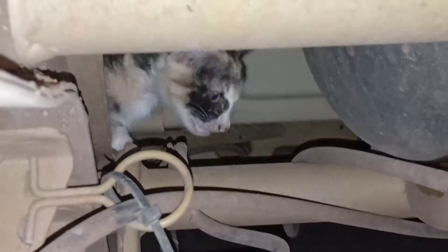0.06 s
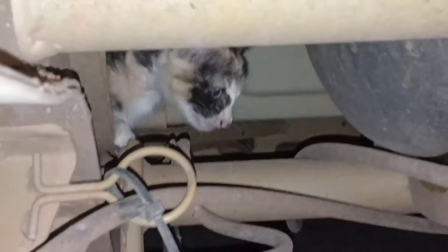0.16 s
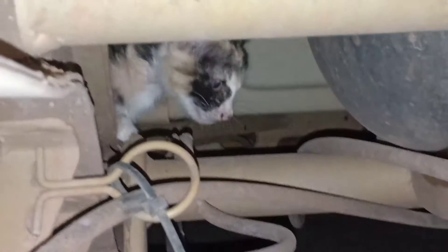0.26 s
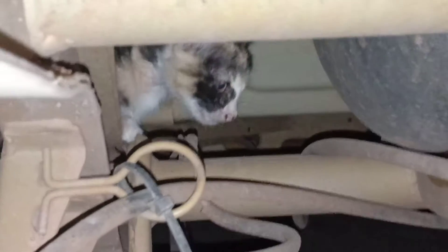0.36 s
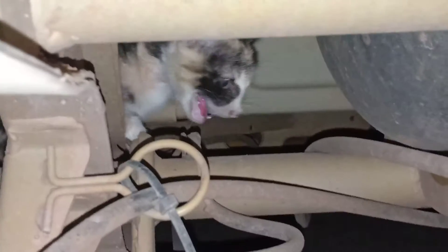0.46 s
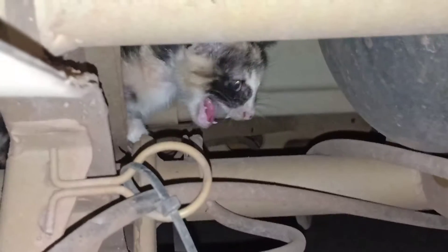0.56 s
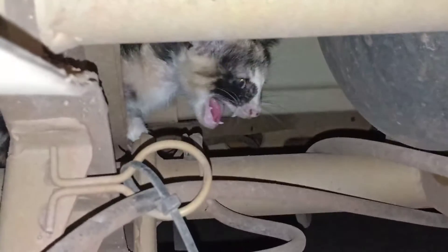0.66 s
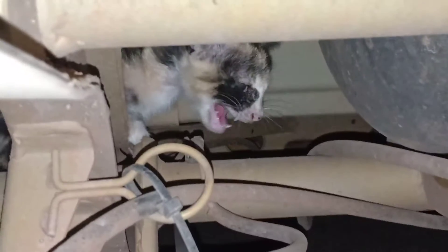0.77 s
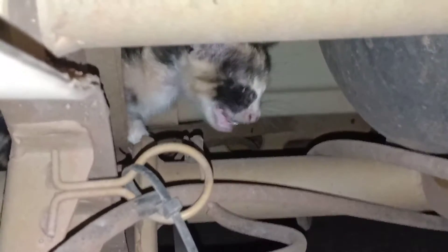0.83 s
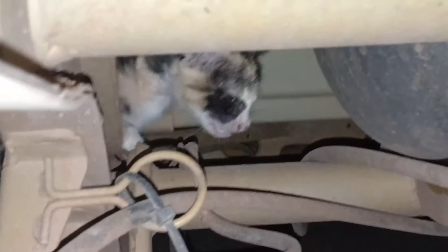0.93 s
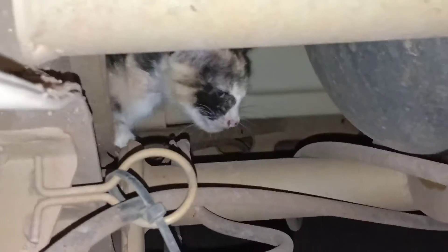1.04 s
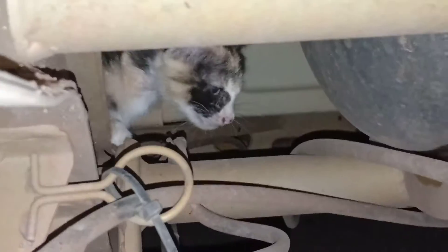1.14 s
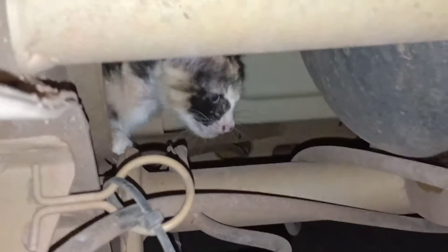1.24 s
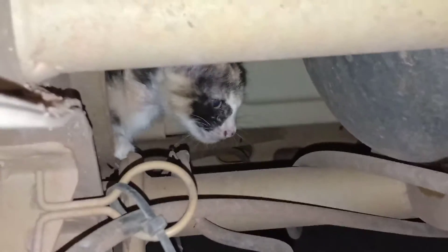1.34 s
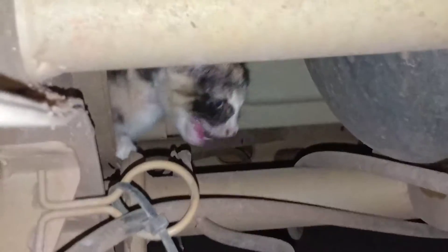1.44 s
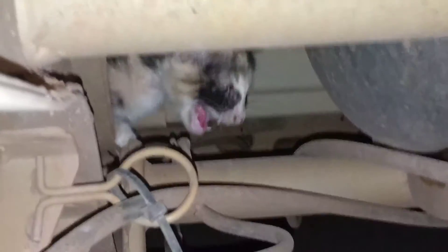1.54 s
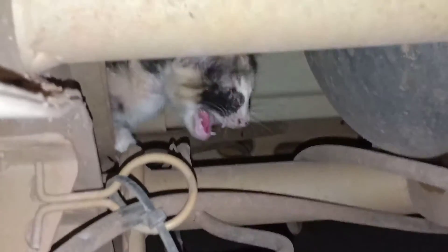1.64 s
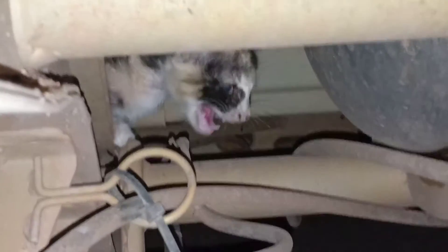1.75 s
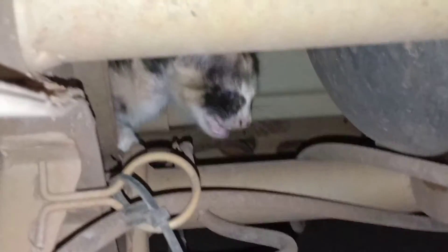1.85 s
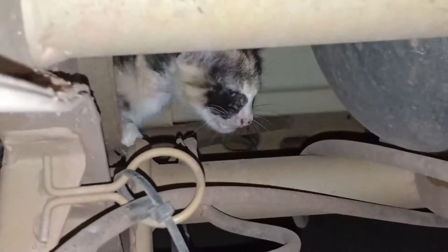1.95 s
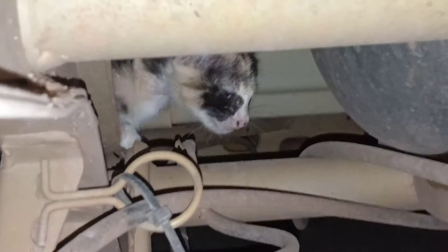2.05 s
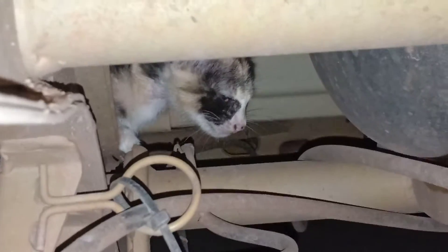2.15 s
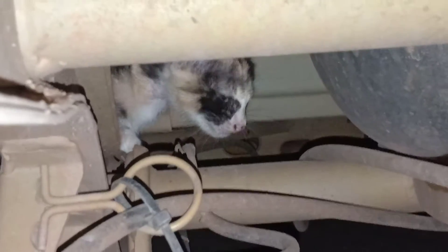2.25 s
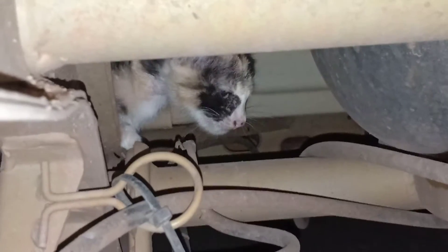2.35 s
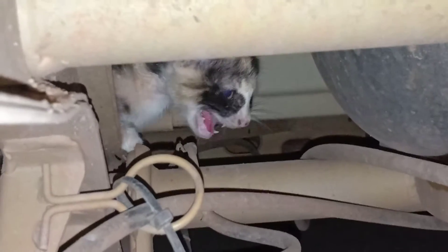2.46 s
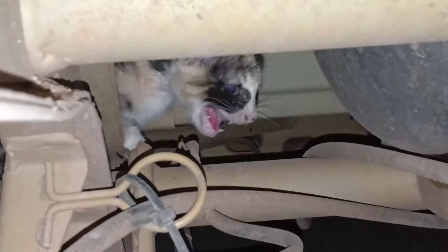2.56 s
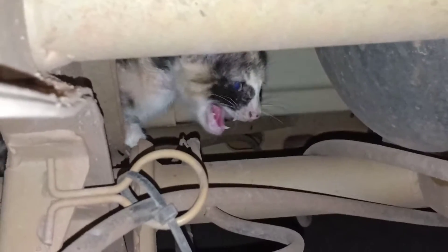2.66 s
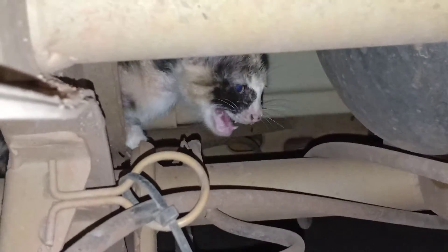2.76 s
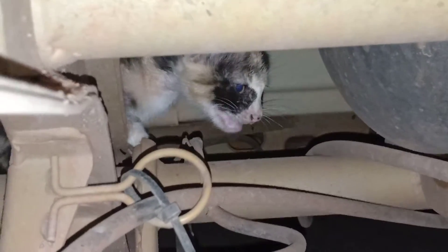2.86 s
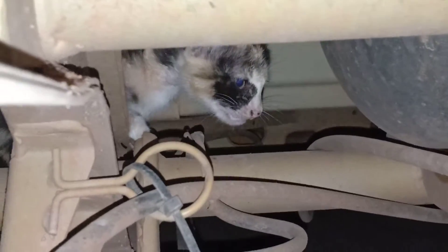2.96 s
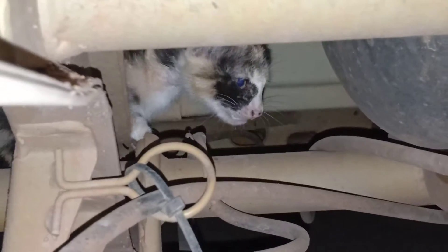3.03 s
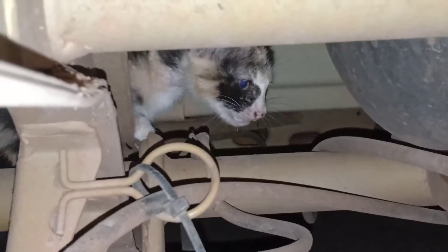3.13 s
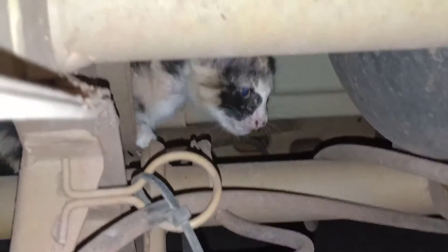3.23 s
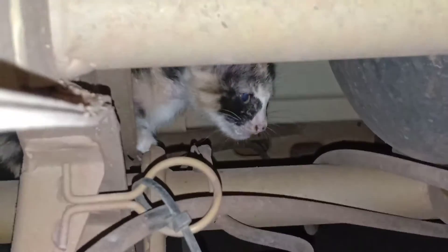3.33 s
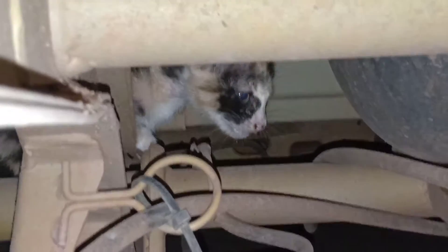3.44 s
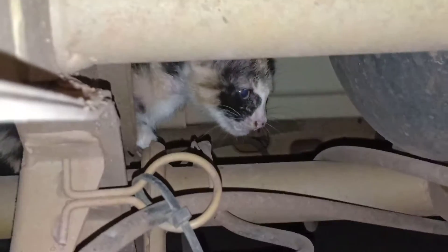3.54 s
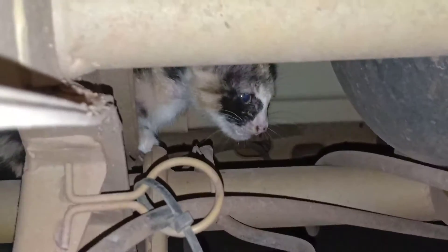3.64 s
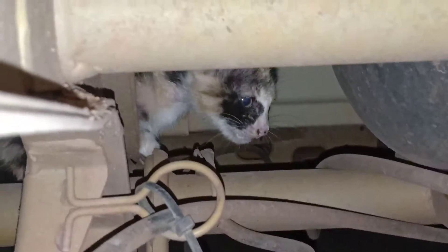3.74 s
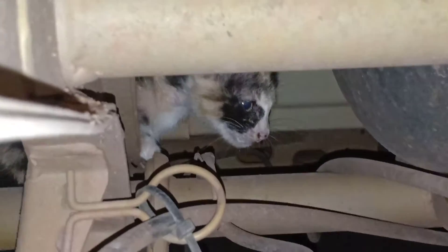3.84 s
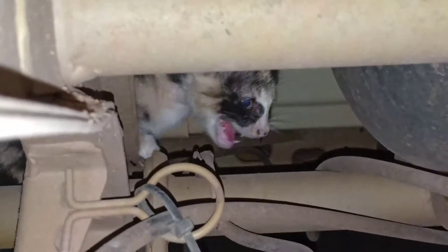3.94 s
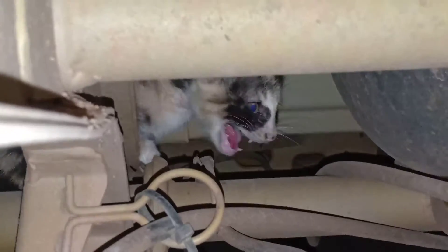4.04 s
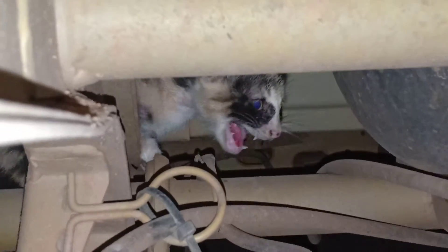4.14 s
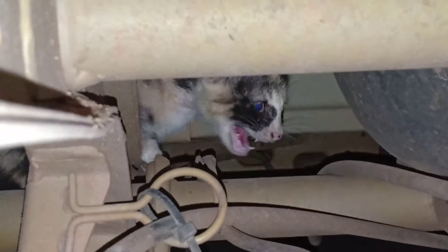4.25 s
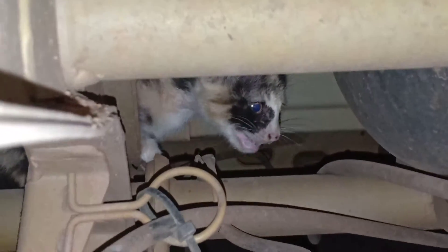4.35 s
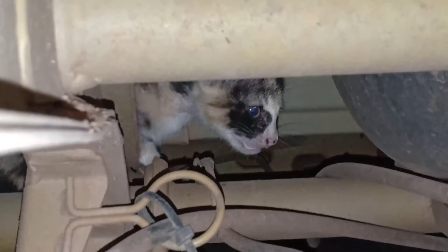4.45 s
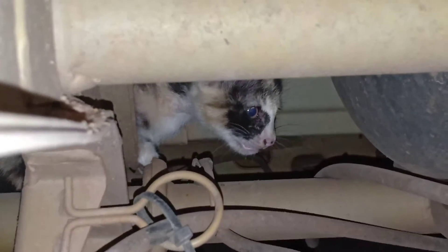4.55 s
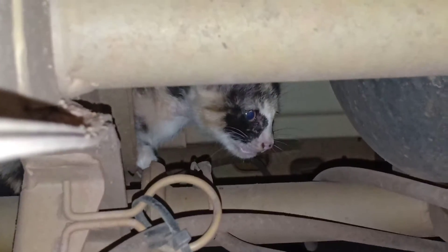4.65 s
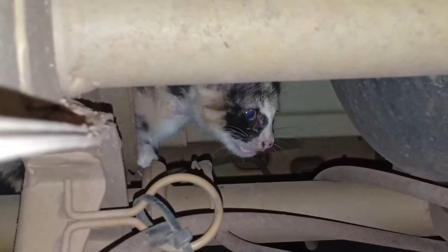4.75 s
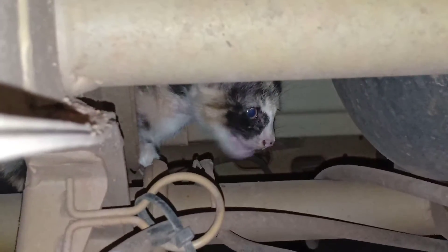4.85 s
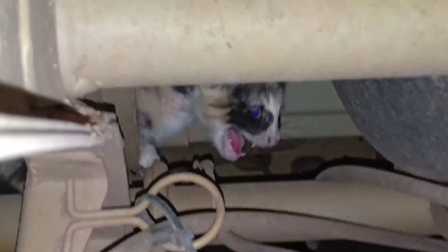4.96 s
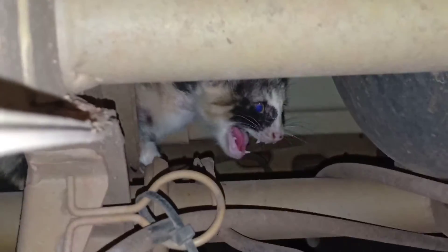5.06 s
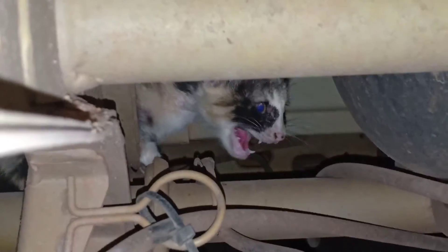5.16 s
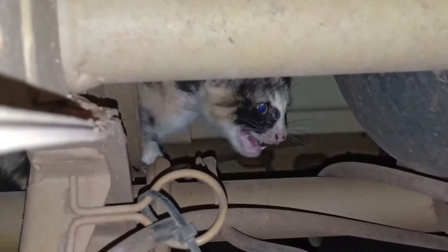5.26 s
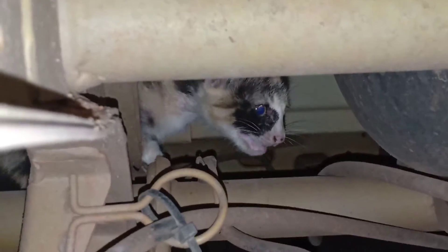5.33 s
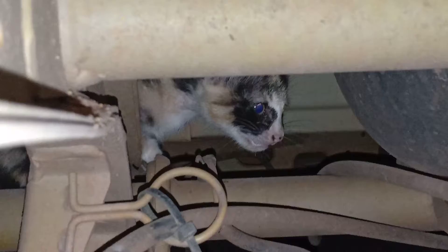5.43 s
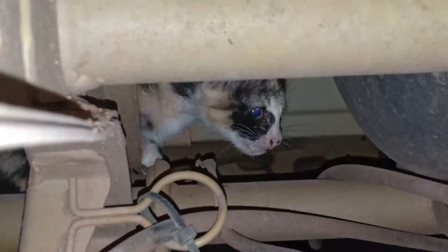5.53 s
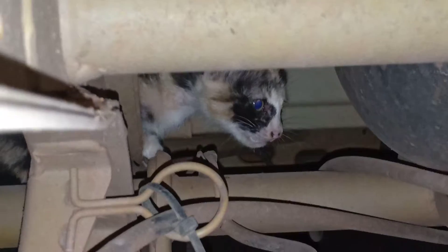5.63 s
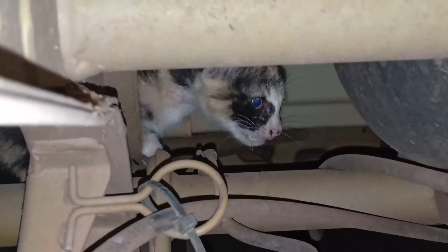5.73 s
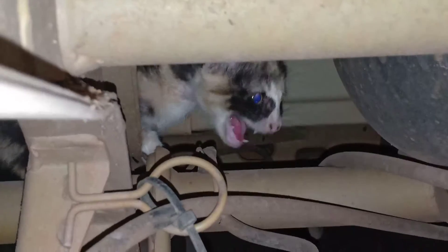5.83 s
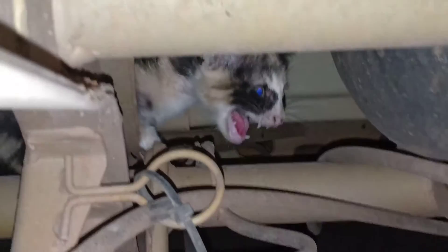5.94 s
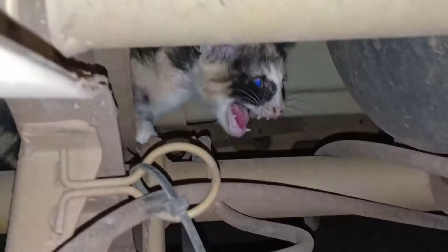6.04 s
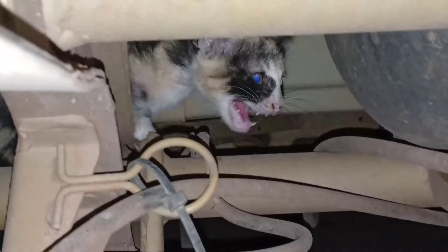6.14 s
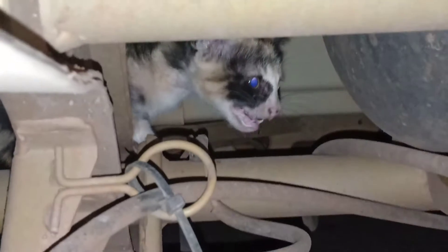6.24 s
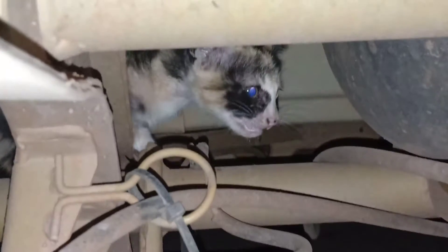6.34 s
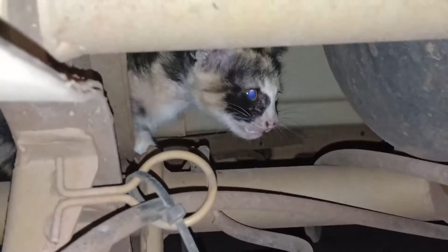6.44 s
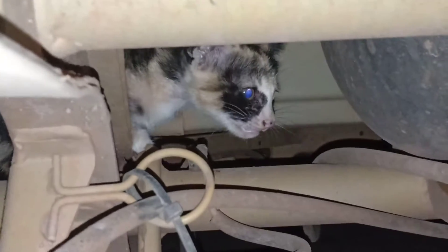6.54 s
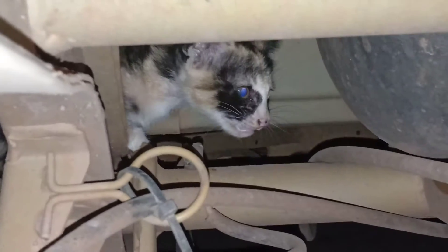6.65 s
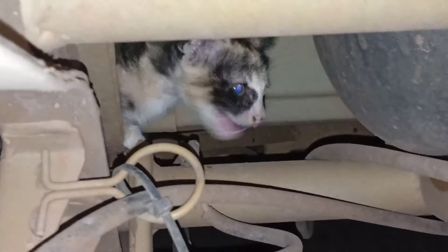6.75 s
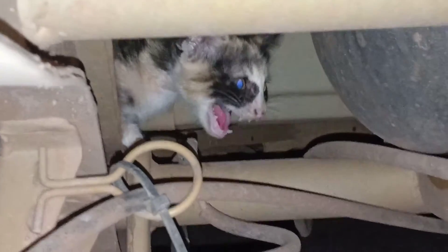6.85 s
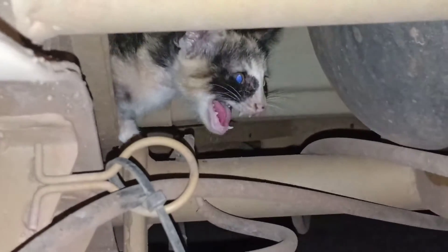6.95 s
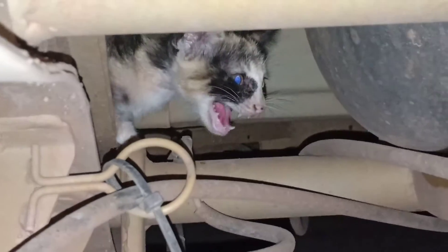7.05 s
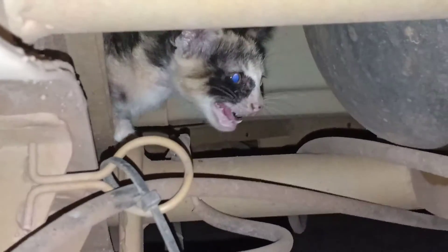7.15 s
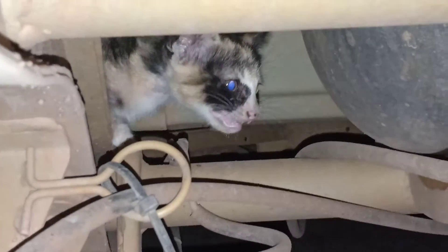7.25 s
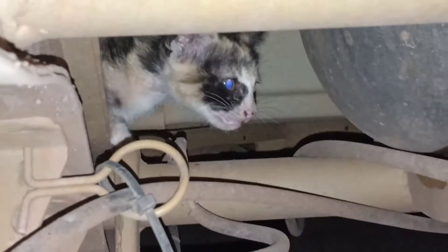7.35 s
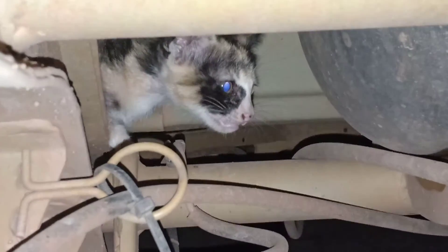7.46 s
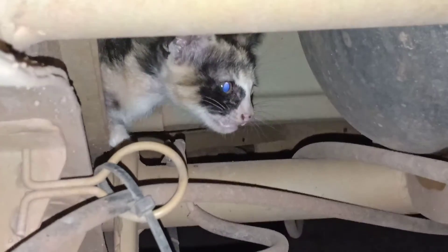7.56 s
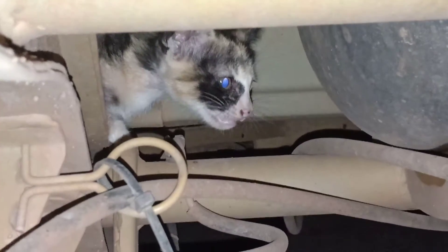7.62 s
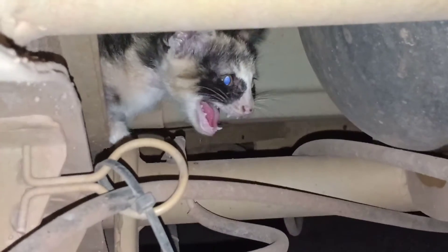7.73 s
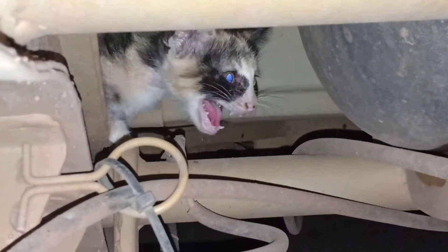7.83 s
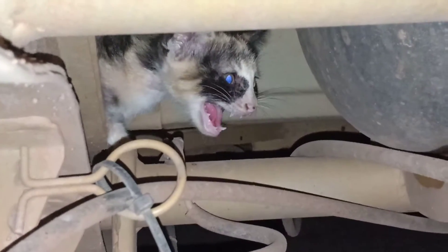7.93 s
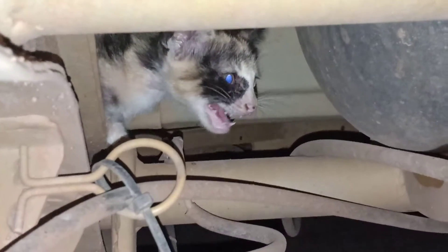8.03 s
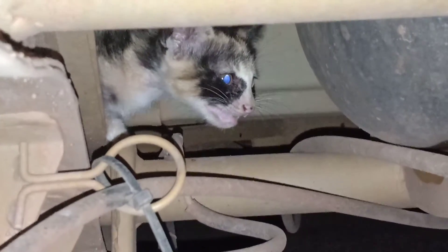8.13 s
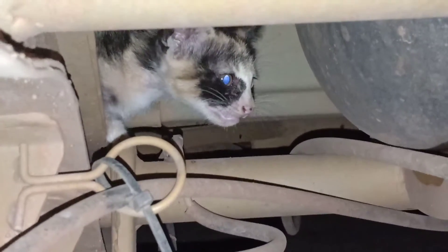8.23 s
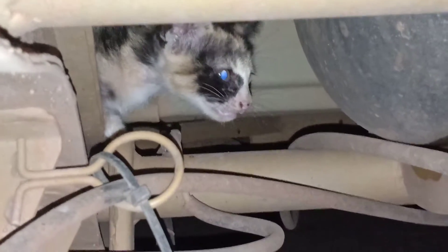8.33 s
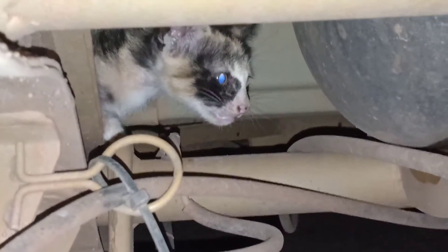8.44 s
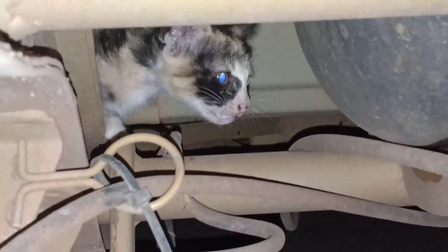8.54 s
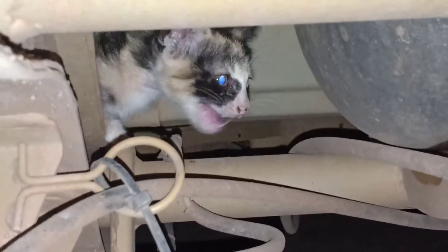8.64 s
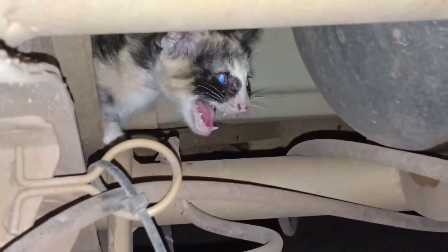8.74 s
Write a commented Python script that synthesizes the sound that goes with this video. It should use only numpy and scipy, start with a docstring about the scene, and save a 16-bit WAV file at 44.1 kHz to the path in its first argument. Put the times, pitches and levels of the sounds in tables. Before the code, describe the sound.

A kitten in distress meows loudly, close to the microphone, inside a cramped metal space. Each cry lasts under half a second, squeaks on high, opens bright and sags into a short creak. Early ones crack hoarsely. Short metallic reflections follow. Behind are low rumble, faint hiss, a distant engine drone, a faint insect rasp and a few soft bumps. The cries are almost entirely on the left.

```python
"""Inside a metal housing, close up, a kitten cries again and again.
Each cry squeaks on, opens, sags in pitch as the mouth shuts and ends in a creak; under strain the voice
cracks an octave down. The cries are sums of vocal-fold harmonics shaped by a throat and a moving jaw.
Metal walls throw them back as short echoes and ring a little. Behind lie shaped noise (low rumble, faint hiss),
soft bumps, a far engine, a far call, an insect and a scuff. On the right the cries are only a dull trace."""
import sys
import numpy as np
from scipy import signal
from scipy.fft import rfft, irfft, next_fast_len
from scipy.io import wavfile
from scipy.ndimage import uniform_filter1d

SR = 44100
rng = np.random.default_rng(int(sys.argv[2]) if len(sys.argv) > 2 else 0)


def waveform_to_disk(signal):
    """Save audio, clipped to [-1, 1], as 16-bit WAV at the path in sys.argv[1]."""
    frames = np.transpose(np.atleast_2d(signal))
    scaled = np.clip(frames, -1, 1) * 32767
    samples = np.round(scaled).astype(np.int16)
    wavfile.write(sys.argv[1], SR, samples)


N = 387638


def gain_of(db):
    """Decibels to gain."""
    return 10 ** (np.asarray(db) / 20)


def evened(x):
    """Scales to rms 1."""
    return x / np.sqrt(np.mean(abs(x) ** 2) + 1e-20)


def read(points, hz):
    """Reads a spectrum on a log-frequency axis."""
    f, value = np.transpose(points)
    return np.interp(np.log(hz + 1), np.log(f + 1), value)


def add(mix, s, sound):
    """Mixes a sound in at time s, trimming what falls outside."""
    at = round(s * SR)
    sound = sound[max(-at, 0):]
    part = mix[max(at, 0):][:len(sound)]
    part += sound[:len(part)]


def wander(t, hz):
    """Random motion of rms 1, up to about hz."""
    knots = np.arange(t[0], t[-1] + 1 / hz, .5 / hz)
    return evened(np.interp(t, knots, rng.standard_normal(len(knots))))


def background(spectrum, level_db, patchy_db):
    """Steady noise with drifting patches, weaker and partly unrelated on the right; level_db is the mono rms."""
    # right channel against the left: (frequency [Hz], level [dB])
    right_db = [(50, -2.5), (120, -13.5), (400, -15), (2500, -10.5), (5000, -19), (9000, -4.5),
                (14000, -0.5)]
    # how alike left and right are: (frequency [Hz], correlation [-1 to 1])
    likeness = [(60, 0.32), (150, 0.13), (390, -0.059), (1000, 0.096), (2540, 0.4), (6480, 0.11)]
    frames, hz = N // 512 + 5, np.fft.rfftfreq(2048, 1 / SR)
    a, b, c, d, patches = rng.standard_normal((5, frames, len(hz)))
    # smooth the patches over time, then over frequency
    patches = uniform_filter1d(patches, 9, 0)
    patches = evened(uniform_filter1d(patches, 12, 1))
    same = np.clip(read(likeness, hz), -1, 1)
    left = a + 1j * b
    unrelated = c + 1j * d
    right = (same * left + np.sqrt(1 - same ** 2) * unrelated) * gain_of(read(right_db, hz))
    z = np.array([left, right]) * gain_of(read(spectrum, hz) + patchy_db * patches)
    x = signal.istft(z.transpose(0, 2, 1), nperseg=2048, noverlap=1536)[1][:, :N]
    return gain_of(level_db) * x / x.mean(0).std()


def far_tone(rows, harmonics):
    """A distant, slightly wavering stack of a few harmonics, gliding in pitch and level."""
    s, hz, db = np.transpose(rows)
    t, out = np.arange(s[0], s[-1], 1 / SR), np.zeros(N)
    wavering_hz = np.interp(t, s, hz) * (1 + 0.0075 * wander(t, 8.1))
    turns = np.cumsum(wavering_hz) / SR
    stack = evened(sum(np.sin(2 * np.pi * k * turns) / k for k in harmonics))
    add(out, s[0], stack * gain_of(np.interp(t, s, db)))
    return out


def insect(level_db=-67, hz=8700, width_hz=520, depth=0.27, throbs_per_s=7.8):
    """A far insect: a narrow, high noise rasp that throbs almost evenly."""
    t = np.arange(N) / SR
    band = signal.butter(2, [hz - width_hz / 2, hz + width_hz / 2], "band", fs=SR)
    rasp = signal.lfilter(*band, rng.standard_normal(N))
    throb = 1 + depth * np.cos(2 * np.pi * throbs_per_s * t + .4 * wander(t, 0.72))
    return gain_of(level_db) * evened(rasp * throb)


def bumps():
    """Soft, low thuds: sines of unsteady pitch that swell and fade."""
    # (centre time [s], half-length [s], mean pitch [Hz], peak level [dB])
    thuds = [(1.52, 0.074, 102.6, -41.5), (3.365, 0.068, 107, -36.5), (7.57, 0.0484, 109, -47),
             (8.53, .22, 107.8, -40)]
    out = np.zeros(N)
    for s, length, hz, db in thuds:
        t = np.arange(-length, length, 1 / SR)
        unsteady_hz = hz * (1 + .1 * wander(t, 30))
        thud = np.sin(2 * np.pi * np.cumsum(unsteady_hz) / SR)
        add(out, s - length, gain_of(db) * thud * np.hanning(len(t)) ** 2)
    return out


def scuff(s=3.17, length=0.063, low_hz=2100, high_hz=3000, level_db=-56):
    """One faint, soft scuff of band-passed noise, perhaps a paw on the metal."""
    noise, out = rng.standard_normal(round(length * SR)), np.zeros(N)
    rub = signal.lfilter(*signal.butter(1, [low_hz, high_hz], "band", fs=SR), noise)
    add(out, s, gain_of(level_db) * evened(rub) * np.hanning(len(rub)))
    return out


def housing(x, scatter_db=-22):
    """Dense late reflections, and a few ringing modes of the metal and the air inside it."""
    # ringing modes: (frequency [Hz], gain at resonance [dB], time to fall 60 dB [s])
    modes = [(510, -7, .16), (2130, -20, .42), (2200, -24, .35), (2960, -20, .45)]
    # late reflections: (frequency [Hz], time to fall 60 dB [s])
    decay_times = [(300, .22), (2000, .25), (5000, .2), (14000, .13)]
    size = SR // 2
    taps = rng.standard_normal(size) * (np.arange(size) > .006 * SR)  # silent for the first 6 ms
    hz, t, z = signal.stft(taps, SR, nperseg=256)
    fading = z * gain_of(-60 * t / read(decay_times, hz)[:, None])
    tail = signal.istft(fading, SR, nperseg=256)[1][:size]
    tail *= gain_of(scatter_db) / np.linalg.norm(tail)
    t = np.arange(size) / SR
    for mode_hz, db, t60 in modes:
        decay = gain_of(-60 * t / t60)
        tail += 2 * gain_of(db) * decay / decay.sum() * np.sin(2 * np.pi * mode_hz * t)
    return signal.fftconvolve(x, tail)[:N]


def reflected(x, head_moves_ms=0.085):
    """Near walls comb the cry, so harmonics swell and dip as the pitch slides; the paths shift from cry to cry."""
    # near walls: (mean echo delay [ms], gain [ratio])
    walls = [(1.1, 0.21), (2.7, -0.26), (4.05, 0.16), (4.7, -0.13), (5.35, -0.25), (7.2, 0.16),
             (8.6, -0.15), (9.4, 0.23), (15, 0.14)]
    size = next_fast_len(len(x) + SR // 50)
    hz = np.fft.rfftfreq(size, 1 / SR)
    comb = np.ones(len(hz), complex)
    for ms, gain in walls:
        delay_s = (ms + head_moves_ms * rng.standard_normal()) / 10 ** 3
        comb += gain * np.exp(-2j * np.pi * hz * delay_s)
    return irfft(rfft(x, size) * comb, size)


def cracking(t, edge=.02, clean=.043):
    """Under strain strong and weak pulses alternate: strength of the half-pitch lines and roughness over time."""
    # (from [s], to [s], base level of half-pitch lines [dB], roughness added [0-1])
    cracks = [(0.607, 0.633, -2.5, 0.07), (0.656, 0.698, -2.5, 0.25), (0.773, 0.83, -4.5, 0.05),
              (1.65, 1.727, 2, 0.15), (1.715, 1.841, 0, 0.02), (1.845, 1.89, -18, 0.06),
              (2.604, 2.713, 1.5, 0.21), (2.701, 2.818, -3.5, 0.03), (4.12, 4.136, -6, 0.1),
              (4.283, 4.35, -16.5, 0.01), (5.066, 5.087, 1, 0.07), (5.24, 5.294, -13, 0.01),
              (5.994, 6.031, -10, 0.15), (6.077, 6.105, -8, 0.1), (7.098, 7.108, -18.5, 0.21),
              (7.865, 7.896, -10, 0.09), (8.033, 8.056, -20, 0.15)]
    halves, rough = np.zeros(len(t)), np.full(len(t), clean)
    for start, end, db, roughness in cracks:
        gate = np.clip(np.minimum(t - start, end - t) / edge + .5, 0, 1)
        halves += gain_of(db) * gate
        rough += roughness * gate
    return halves, rough


def pitch_of(since, length, top_hz, top_at, catch, climb, fall, catch_s=.042, fall_curve=1.7):
    """Pitch in Hz: the folds catch high, settle, climb to a top and then fall ever faster."""
    u, top_at = since / length, np.clip(top_at, .05, .95)
    rising = np.clip(1 - u / top_at, 0, 1)
    falling = np.clip((u - top_at) / (1 - top_at), 0, 1)
    caught = catch * np.exp(-(since / catch_s) ** 2)
    return top_hz * (1 + caught - climb * rising ** 2 - fall * falling ** fall_curve)


def gesture(since, length, effort_db, attack_s, swell_db, open_hz, shut_at, treble_db):
    """Effort dB, mouth resonance Hz and treble dB through one cry, from one push and one movement of the jaw."""
    u = since / length
    # effort builds quickly, swells through the cry, trembles and gives way over the last 42 ms
    soft = np.exp(-since / attack_s)
    spent = np.clip(1 - (length - since) / 0.042, 0, 1)
    effort = effort_db + swell_db * (u - .5) - 17.5 * soft - 9 * spent + 0.78 * wander(since, 18)
    # the jaw starts ajar, drops open, holds, then shuts steadily, shaking a little
    ajar, open_s, shut_hz = 0.3, 0.04, 2124
    opening = 1 - (1 - ajar) * np.exp(-(since / open_s) ** 2)
    opening = opening * np.clip((1 - u) / (1 - shut_at), 0, 1)
    opening = opening * (1 + .035 * wander(since, 13.4))
    # the lips hold the treble back until the jaw is open by this share, give or take the edge
    treble_opening, treble_edge = 0.42, 0.1
    shut_treble_db, soft_treble_db = -23, -10.5
    let_out = 1 / (1 + np.exp((treble_opening - opening) / treble_edge))
    treble = shut_treble_db + (treble_db + soft_treble_db * soft - shut_treble_db) * let_out
    return effort, shut_hz + (open_hz - shut_hz) * opening, treble


def throat_db(hz, mouth_hz, treble_db, sharpness, peak_db=16.0, width_hz=273):
    """A fixed throat, one resonance that follows the jaw, and treble that escapes as the mouth opens."""
    # fixed throat colour: (frequency [Hz], level [dB])
    throat = [(550, -7.5), (700, 0), (1150, 1.7), (1750, 6), (2350, 5), (3000, 2.5), (4200, -2), (5500, 6),
              (6300, -11), (7300, -22.5), (9800, -42), (11500, -26.5), (13500, -24.5), (15000, -50.5)]
    resonance = sharpness * peak_db / (1 + ((hz - mouth_hz) / width_hz) ** 2)
    return read(throat, hz) + resonance + treble_db * np.clip((hz - 2200) / 2400, 0, 1)


def cry(start, length, pitch, mouth, lead=0.011, release=0.036, squeak=.4, sag=.14, creak_hz=150,
        edge_rough=1.0, release_db=-8, muffle_db=-7, nasal_db=4, rough_drag=.04):
    """Harmonics of the vocal folds, with half-pitch lines between them under strain, shaped by the throat."""
    end = start + length
    t = np.arange(start - lead, end + release, 1 / SR)
    before, after = np.clip((start - t) / lead, 0, 1), np.clip((t - end) / release, 0, 1)
    since = np.clip(t - start, 0, length)
    effort_db, mouth_hz, treble_db = gesture(since, length, *mouth)
    halves, rough = cracking(t)
    # the resonance sinks as the mouth closes, and is damped by a cracking voice or closing lips
    mouth_hz = mouth_hz * (1 - .78 * after ** .8)
    sharpness = 1 - 0.67 * np.minimum(halves + 3 * after, 1)
    # the folds squeak on high, then go slack at the end
    hz = pitch_of(since, length, *pitch) * (1 + squeak * before - sag * np.minimum(4 * after, 1))
    hz *= 1 + .002 * wander(t, 45) + (.002 + .025 * rough) * wander(t, 160)
    hz *= 1 - rough_drag * (rough - rough.min())  # roughness drags the pitch down
    turns = np.cumsum(hz) / SR
    halves = halves * gain_of(1.5 * wander(t, 25)) + .6 * np.sqrt(after)
    voice = np.zeros(len(t))
    for k in np.arange(2, 54) / 2:  # multiples of the pitch, in halves
        angle = 2 * np.pi * (k * turns + rng.random())
        strength = 1
        if k % 1 != 0:
            # half lines come and go one by one, the lowest are weak
            strength = halves * min(k / 4.5, 1.15) * gain_of(3.5 * wander(t, 9))
        # the higher a line, the more it flutters
        strength = strength * gain_of(min(k / 6, 3.5) * wander(t, 28))
        # uneven cycles blur the high harmonics most
        blur = rough * min(k / 6, 1.3) + edge_rough * np.sqrt(before + after)
        blurred = blur * wander(t, 220) * np.cos(angle + rng.uniform(0, 2 * np.pi))
        line = strength * np.cos(angle) + blurred
        # as the lips close, the lowest lines hum on through the nose and the higher ones are muffled
        line = line * gain_of(nasal_db * np.minimum(3 * after, 1) * np.clip(3.5 - k, 0, 2) / 2)
        muffled_db = muffle_db * after * min(np.log2(k), 2)
        voice += line * gain_of(throat_db(k * hz, mouth_hz, treble_db, sharpness) + muffled_db)
    # slack folds beat in a few separate pulses
    pulses = np.cos(2 * np.pi * creak_hz * (t - end) + wander(t, 60))
    creak = 1 - np.minimum(4 * after, .55) * pulses
    fade = np.minimum(4 * (1 - before), 1) * np.minimum(4 * (1 - after), 1)
    return t[0], voice * creak * fade * gain_of(effort_db + release_db * after)


def scene(bump_right_db=-11, far_right_db=-13):
    """The kitten in its housing over the background; only a trace of it reaches the right channel."""
    # noise colours before levelling: (frequency [Hz], relative level [dB per Hz])
    rumble = [(15, -49.5), (25, -41), (43, -36.5), (59, -8), (104, 2), (186, -4.5), (253, -14), (374, -7),
              (487, -17.5), (545, -8.5), (626, -18), (700, -17.5), (910, -52.5), (1540, -120)]
    hiss = [(500, -17.5), (700, 2.5), (1400, -2.5), (2700, -1), (3300, -13), (4300, -11.5), (5250, -3.5),
            (6100, -15), (7700, -21), (8700, -48), (9700, -26.5), (13500, -25), (15500, -44.5)]
    # a far engine drones in and out: (time [s], pitch [Hz], level [dB])
    drone = [(0, 177.5, -53.5), (.4, 175.3, -56), (.9, 192.8, -59), (1.5, 204, -58), (2, 200, -66),
             (4.6, 165.4, -68), (5, 162.4, -60.5), (5.8, 163.8, -57.5), (6.2, 160, -77)]
    # a far, faint falling call, heard by its 2nd and 3rd harmonics: (time [s], base pitch [Hz], level [dB])
    far_call = [(3.05, 520, -74), (3.2, 502, -64), (3.35, 482, -64), (3.5, 460, -65)]
    # cries: (start [s], length [s], nominal top pitch [Hz], top at [share of length], high catch [share of pitch],
    # climb [share of pitch], fall [share of pitch], base effort [dB], attack [s], swell [dB],
    # open-mouth resonance [Hz], jaw starts to shut [share of length], open-mouth treble [dB])
    cries = [(-.28, 0.38, 602.3, 0.76, 0.077, .06, 0.14, -27, .04, -17.5, 4000, 0.47, -5),
             (0.601, 0.37, 619.6, 0.35, 0.17, 0.056, 0.11, -29.5, 0.051, 6.5, 3830, .6, 1.5),
             (1.581, 0.37, 605.3, 0.64, 0.11, 0.026, 0.11, -31.5, 0.03, 6, 3670, 0.61, -5),
             (2.54, 0.4, 596.4, 0.57, 0.17, 0.0058, 0.14, -32.5, .045, 5.5, 3680, 0.55, -5),
             (4.075, 0.36, 614.4, .43, 0.24, 0.15, 0.11, -30.5, 0.025, 10, 3920, 0.55, 0.5),
             (5.016, 0.37, 612.7, 0.39, 0.056, 0.048, 0.12, -28, 0.037, 6.5, 3996, .55, -.5),
             (5.958, 0.37, 608.2, .53, .026, .035, .162, -27.5, .032, 4, 4360, 0.515, 2),
             (6.904, 0.38, 601.4, .34, 0.072, 0.078, .11, -27.5, 0.044, 3, 4230, .5, 1),
             (7.81, 0.37, 584.2, 0.54, .066, 0.051, 0.14, -27.5, 0.048, 2.5, 4245, 0.55, -0.5),
             (8.788, .37, 613, .45, 0.092, 0.048, .13, -27.5, .04, 6.5, 4000, .55, -3)]
    floor = background(rumble, -53, patchy_db=0.5) + background(hiss, -58.5, patchy_db=0)
    far = far_tone(drone, harmonics=range(1, 3)) + far_tone(far_call, harmonics=range(2, 4))
    far = far + insect() + scuff()
    kitten = np.zeros(N)
    for start, length, top_hz, top_at, catch, climb, fall, *mouth in cries:
        s, voice = cry(start, length, (top_hz, top_at, catch, climb, fall), mouth)
        add(kitten, s, reflected(voice))
    kitten = kitten + housing(kitten)
    leak = gain_of(-29.5) * signal.lfilter(*signal.butter(3, 2100, fs=SR), kitten)
    mix = np.array([kitten, leak]) + floor
    mix = mix + far * gain_of([[0], [far_right_db]])
    return mix + bumps() * gain_of([[0], [bump_right_db]])


def record(dry, edge_hz=15400):
    """The recorder's band limit: a steep low-pass."""
    low_pass = signal.firwin(511, edge_hz, window=("kaiser", 9), fs=SR)
    return signal.oaconvolve(dry, low_pass[None], "same")


dry = scene()
out = record(dry)
waveform_to_disk(out)
```